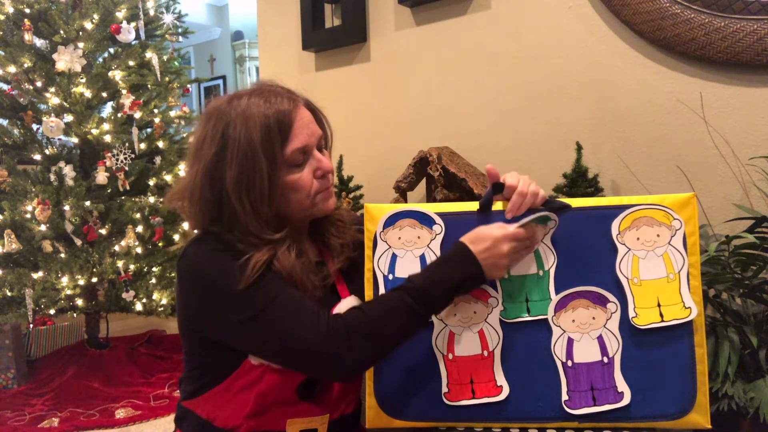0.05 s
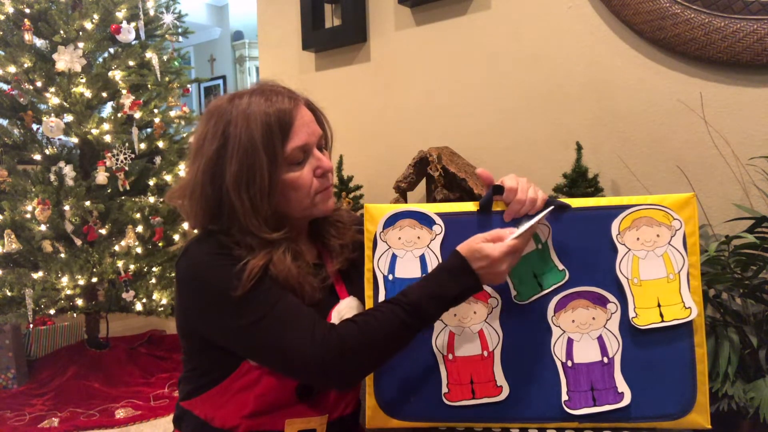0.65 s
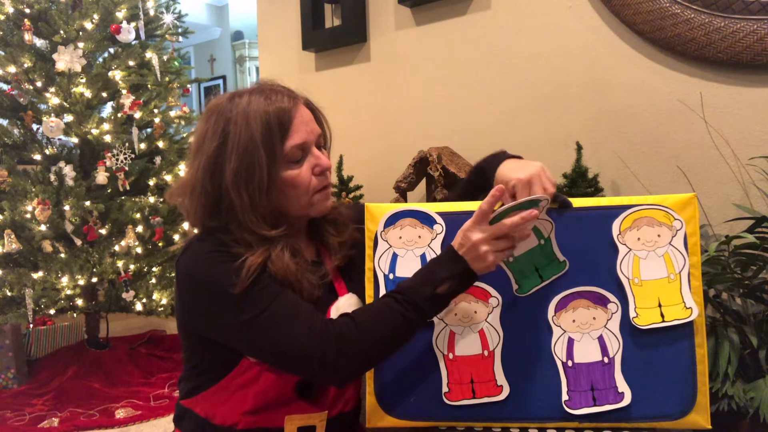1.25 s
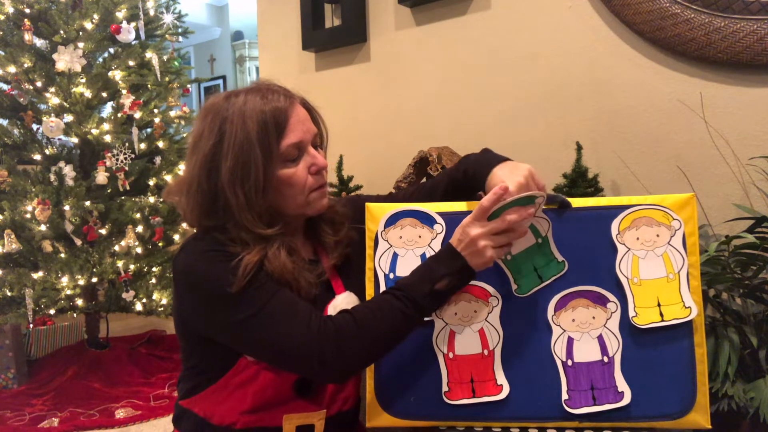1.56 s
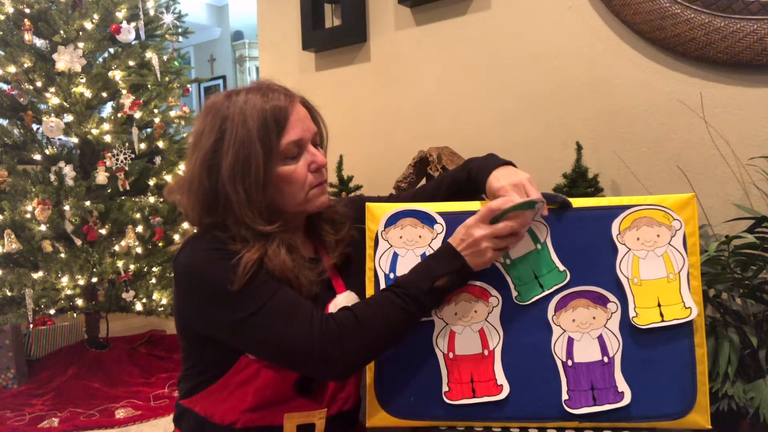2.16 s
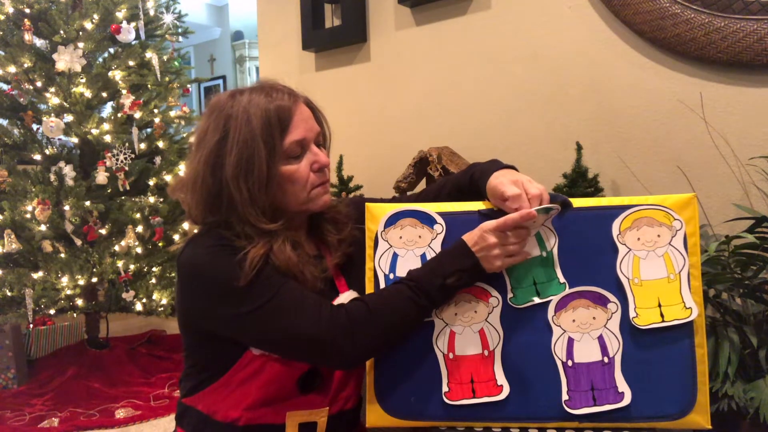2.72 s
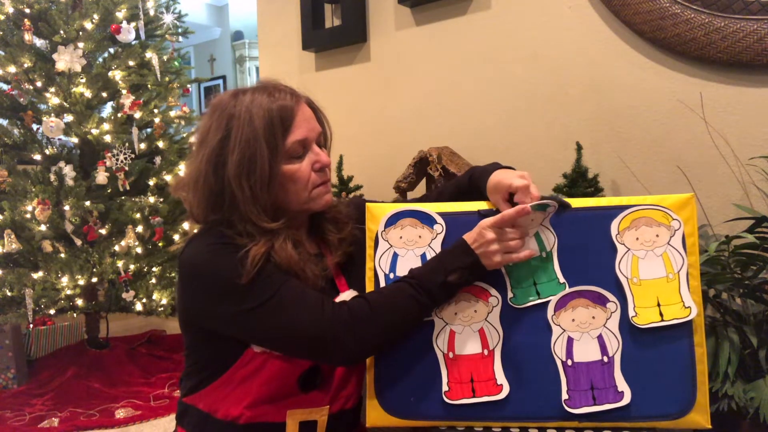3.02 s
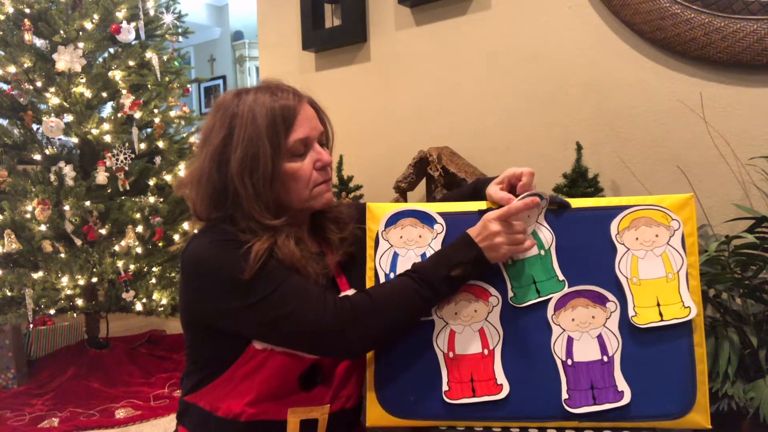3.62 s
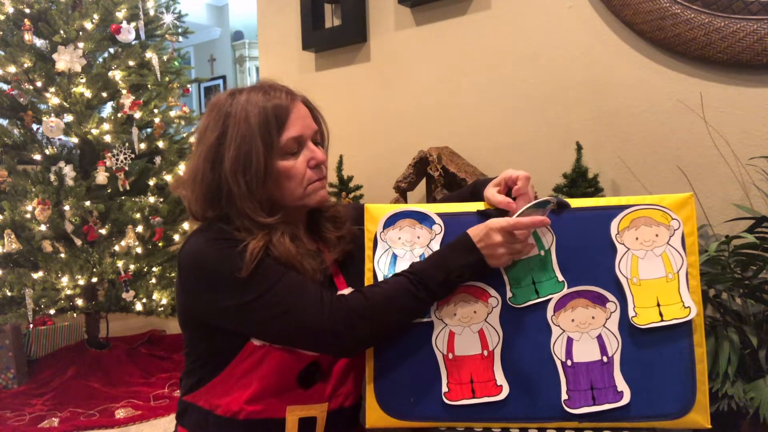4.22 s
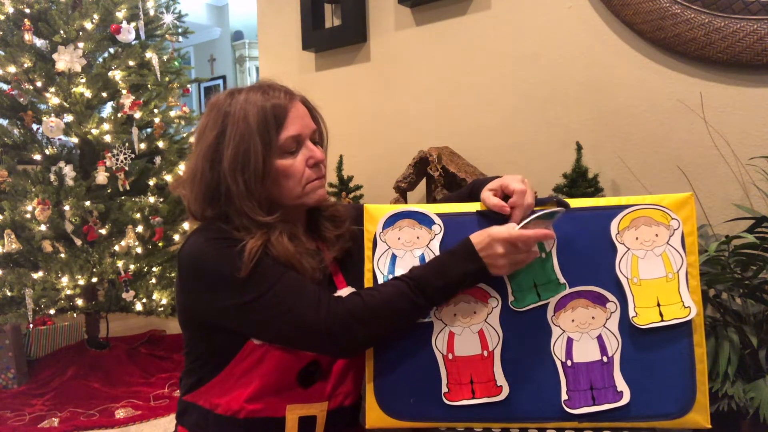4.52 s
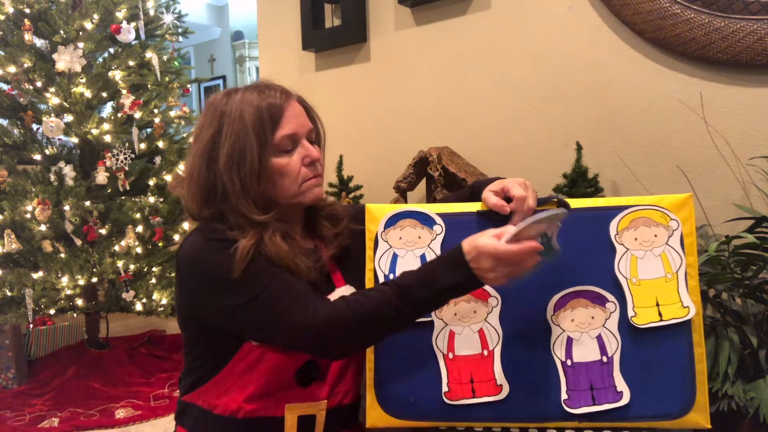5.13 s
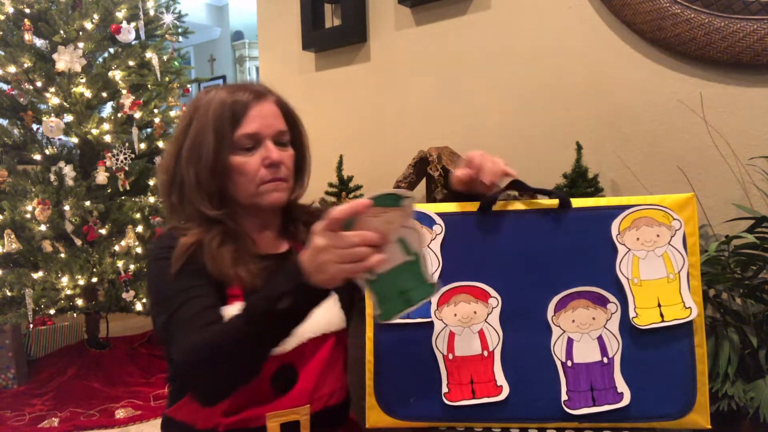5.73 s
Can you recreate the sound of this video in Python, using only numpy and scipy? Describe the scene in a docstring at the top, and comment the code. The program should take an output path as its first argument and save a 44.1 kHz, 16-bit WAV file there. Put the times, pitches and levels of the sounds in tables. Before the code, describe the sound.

In a quiet living room, a nearby microphone catches a card cutout being peeled from a felt board. First comes a short grainy scrape, then soft finger rubbing and occasional papery clicks. Later the hook fastener tears free in several ragged, scratchy bursts, louder than the rest, with soft knocks from the board. Two tiny ticks follow, leaving only low room rumble and faint hiss.

```python
"""Stiff card scrapes over felt with a few dry ticks: a paper cutout is being worked off a felt board.
Fingers rub and pick at it, a sleeve drags on the frame, then its hook fastener lets go in short rips.
Each hook that snaps free gives a tiny crack, sends a bending wave through the card and tugs the board.
The board thumps as it springs back. Around it all: a living room's short tail and low rumble."""
import sys
import numpy as np
from scipy import signal
from scipy.fft import rfft, irfft
from scipy.io import wavfile

SR = 44100
rng = np.random.default_rng(int(sys.argv[2]) if len(sys.argv) > 2 else 0)


def wav_record(signal):
    """Record a signal, one row per channel, as 16-bit PCM in the file named by sys.argv[1]."""
    frames = np.transpose(np.atleast_2d(signal))
    bounded = np.clip(frames, -1, 1)
    # unit amplitude maps onto the largest positive 16-bit level
    quanta = np.round(bounded * 32767).astype(np.int16)
    wavfile.write(sys.argv[1], SR, quanta)


N = 254765
TIME = np.arange(N) / SR
USUAL_PITCH_HZ, BEND_SPREAD = 1673, 0.069  # card at its usual bend; share it strays from hook to hook

# rumble and hiss of the house: frequency_hz, level_db
ROOM_TONE_SPECTRUM = [(15, -72), (28, -39), (45, -6.5), (76, 2.5), (120, -1.5), (190, -6), (300, -5),
                      (480, -7.5), (800, -14), (1400, -17), (2000, -18), (4000, -22.5), (7700, -23.5),
                      (9000, -26.5), (16000, -30.5)]
# colour of the room's tail: frequency_hz, gain_db
TAIL_SPECTRUM = [(100, -19.5), (350, -1), (750, -2), (1100, -6.5), (1420, -10.5), (1700, -11.5),
                 (1950, -13.5), (2400, -6.5), (3000, -6), (3800, -5), (5500, -10), (7500, -5.5),
                 (14000, -6)]
# decay of the room's tail: frequency_hz, t60_s
TAIL_DECAY = [(120, 0.2), (500, 0.22), (1600, 0.27), (4000, 0.25), (14000, 0.12)]

# skin rubbing on card: frequency_hz, level_db
SKIN_SPECTRUM = [(100, -5), (320, -3), (900, -10.5), (1200, -3), (1520, 4), (1850, 0), (2500, -1),
                 (3700, -7.5), (7000, -12), (9000, -17.5), (15500, -24)]
# card scraping on felt: frequency_hz, level_db
SCRAPE_SPECTRUM = [(100, -46), (320, -7), (560, -14.5), (700, -5), (850, -12.5), (1100, -2), (1400, -1.5),
                   (1750, 6), (2100, 1), (2450, 2.5), (3300, -5), (4500, -7), (6600, -8.5), (9000, -17),
                   (15500, -28)]
# what the card radiates when flicked: frequency_hz, level_db
CARD_SPECTRUM = [(500, -27), (790, -12), (960, -18.5), (1150, -8.5), (1350, -1), (1490, 5.5), (1690, -6.5),
                 (1920, 1), (2250, -6), (3000, -14.5), (4200, -20), (8000, -54)]
# the crack of a hook: frequency_hz, level_db
CRACK_SPECTRUM = [(900, -12.5), (2000, 0.5), (3200, -2), (4500, -3.5), (6800, -0.5), (8500, -8),
                  (10800, -9.5), (13000, -14.5), (15500, -24)]
# the board's modes before a hand damps them: pitch_hz, level_db, t60_s
BOARD_MODES = [(73, -47, 0.071), (132.3, -9.5, 0.15), (190, -16, 0.057), (296, -3, 0.05), (326, -1, 0.067),
               (393, 4, 0.026), (485, -17, 0.068), (518, -1.5, 0.036), (698, 1, 0.059), (803, -2, 0.034),
               (1058, 0.5, 0.043)]

# a sleeve drags over the top of the board: start_s, length_s, level_db
SLEEVE_DRAGS = [(1.63, 0.033, -54), (1.745, 0.066, -52.5)]
# fingers stroke the card: start_s, length_s, level_db
FINGER_RUBS = [(1.64, 0.25, -59.5), (1.94, 0.14, -51.5), (2.12, 0.29, -51.5), (2.52, 0.022, -56),
               (2.7, 0.019, -57), (2.83, 0.045, -53.5), (3.035, 0.027, -54.5), (3.29, 0.26, -56.5)]
# the card slides over the felt: start_s, length_s, level_db
CARD_SLIDES = [(0.0, 0.039, -34.5), (0.1, 0.11, -38.5), (0.245, 0.02, -36), (0.62, 0.05, -56.5),
               (0.77, 0.042, -51), (0.9, 0.023, -54), (1.035, 0.076, -54.5), (1.4, 0.063, -61.5)]
# the board springs back as the fastener gives: start_s, level_db
BOARD_RECOILS = [(4.101, -41), (4.336, -38), (4.39, -34), (4.909, -29), (4.922, -37)]
# a whole patch of hooks gives way: start_s, length_s, level_db, unused
HOOK_RIPS = [(3.679, 0.00385, -35.5, -47), (3.744, 0.014, -30.5, -45), (3.804, 0.003, -40.5, -46),
             (4.033, 0.009, -32, -44), (4.059, 0.045, -35.5, -41), (4.328, 0.02, -37.5, -33),
             (4.35, 0.028, -28, -30.5), (4.381, 0.052, -28.5, -34.5), (4.582, 0.03, -30.5, -42),
             (4.758, 0.017, -38, -45), (4.899, 0.025, -28, -36)]
# single snaps and ticks: mostly hooks and fibres letting go, with a few handling ticks and a bump on the board
# (levels before trims): start_s, pitch_hz, card_db, crack_db, tug_db
ACCENT_SNAPS = [(0.002, 1600, -34.5, -37, -38), (0.0381, 1640, -29.5, -54, -37.5),
                (0.246, 2020, -51, -41, -58), (0.2793, 2000, -43, -41, -38), (0.547, 1670, -38.5, -49, -49.5),
                (0.918, 1680, -41, -56, -49), (1.037, 1680, -57, -63, -44.5), (1.2892, 1800, -47, -51, -51),
                (1.533, 1860, -59, -51.5, -51), (1.9093, 1590, -43.5, -53, -55),
                (1.9573, 1655, -34.5, -44, -43.5), (2.014, 2180, -64, -47, -63),
                (2.3083, 1581, -31.5, -41, -39.5), (2.5036, 1620, -42, -50, -47),
                (2.8595, 1670, -35, -40.5, -39), (3.0512, 1714, -36.5, -53, -37.5),
                (3.3554, 1820, -40.5, -58, -61), (3.4272, 1800, -25, -37, -35.5),
                (3.578, 1710, -36, -48, -59), (3.684, 1670, -34, -44, -41),
                (3.701, 1780, -33.5, -38.5, -35.5), (3.734, 1930, -29, -37, -41),
                (3.8045, 1860, -30.5, -36, -37.5), (3.9581, 1705, -37.5, -41.5, -55),
                (3.9933, 1800, -39, -44, -61), (4.0298, 1890, -25.5, -32.5, -35.5),
                (4.0495, 1780, -21.5, -27, -27.5), (4.0985, 1710, -23, -30.5, -28),
                (4.3329, 1970, -24.5, -27.5, -26), (4.354, 1550, -18, -25, -28.5),
                (4.389, 1530, -20, -35, -20), (4.4115, 1515, -27, -34, -24), (4.4421, 1620, -25.5, -32, -53),
                (4.4622, 1780, -29.5, -36, -45), (4.5172, 1700, -43, -49, -49),
                (4.5493, 1606, -28.5, -33.5, -43.5), (4.5637, 1610, -27, -38, -59),
                (4.605, 1750, -21, -28.5, -28.5), (4.722, 1690, -49, -47, -60), (4.7304, 1650, -34, -42, -55),
                (4.7495, 1690, -28, -30.5, -51), (4.777, 1745, -22.5, -30, -40.5),
                (4.8575, 1670, -29.5, -34.5, -46), (4.9055, 1680, -19, -24, -28),
                (4.9224, 1810, -23.5, -37, -26), (5.2947, 1700, -52, -52.5, -70),
                (5.3377, 1690, -53, -56, -68)]


def from_db(db):
    """Decibels to gain."""
    return 10 ** (np.asarray(db) / 20)


def rms_one(x):
    """Scale to rms 1."""
    return x / np.sqrt(np.mean(x ** 2) + 1e-20)


def as_burst(x):
    """Scale a short sound to the energy of 4 ms at rms 1."""
    return x * np.sqrt(.004 * SR / (np.sum(x ** 2) + 1e-20))


def add(out, start_s, sound):
    """Mix a sound in at its cue."""
    at = int(start_s * SR)
    out[at:at + len(sound)] += sound[:len(out) - at]


def colour(x, spectrum):
    """Minimum-phase EQ that follows a spectrum, so nothing rings ahead of an attack."""
    size = 8192
    hz, db = np.transpose(spectrum)
    bin_hz = np.arange(size // 2 + 1) * SR / size
    log_gain = np.log(from_db(np.interp(np.log(bin_hz + 1), np.log(hz), db)))
    cepstrum = irfft(log_gain)[:size // 2]
    cepstrum[1:] *= 2
    impulse = irfft(np.exp(rfft(cepstrum, size)))
    return signal.fftconvolve(x, impulse)[:len(x)]


def drift(per_s):
    """A wandering random control signal at rms 1."""
    knots = rng.standard_normal(4000)
    return rms_one(np.interp(TIME * per_s, np.arange(len(knots)), knots))


def grains(per_s, spread_db):
    """Random clicks of uneven size and sign."""
    sizes = from_db(spread_db * np.minimum(rng.exponential(1, N), 4))
    signs = rng.choice([-1, 1], N)
    return sizes * signs * (rng.random(N) < per_s / SR)


def strokes(rows, attack_s, release_db_per_s):
    """Envelope of a series of strokes: each swells up to its start, holds for its length and dies away."""
    gain = np.zeros(N)
    for start_s, length_s, level_db in rows:
        swell = np.clip(1 + (TIME - start_s) / attack_s, 0, 1)
        fade_db = release_db_per_s * np.maximum(TIME - start_s - length_s, 0)
        gain = np.maximum(gain, swell * from_db(level_db - fade_db))
    return gain


def room_tone(level_db=-53.5):
    """The bed: low steady rumble of the house under a faint hiss."""
    rumble = colour(rng.standard_normal(N + SR), ROOM_TONE_SPECTRUM)[SR:]
    return from_db(level_db) * rms_one(rumble)


def living_room(x, onset_s=0.002):
    """The room adds a short diffuse tail that builds quickly and dies soonest in the high treble."""
    t = TIME[:SR // 2]
    hz, t60 = np.transpose(TAIL_DECAY)
    edges_hz = np.geomspace(50, 17000, 8)
    build_up = 1 - np.exp(-(t / onset_s) ** 2)
    tail = np.zeros(len(t))
    for low, high in zip(edges_hz, edges_hz[1:]):
        band_t60 = np.interp(np.log(low * high) / 2, np.log(hz), t60)
        envelope = from_db(-60 * t / band_t60) * build_up
        band = signal.butter(2, [low, high], "band", fs=SR, output="sos")
        noise = signal.sosfilt(band, rng.standard_normal(len(t)))
        tail += noise * envelope / np.linalg.norm(envelope)
    return x + signal.fftconvolve(x, colour(tail, TAIL_SPECTRUM))[:N]


def sleeve(band_hz=(290, 530), rough_db=6.5):
    """Cloth dragged over the frame makes the board groan, faint and rough."""
    band = signal.butter(2, band_hz, "band", fs=SR, output="sos")
    groan = signal.sosfilt(band, grains(per_s=900, spread_db=0.5) + 1e-18)
    roughness = from_db(rough_db * drift(per_s=120))
    return strokes(SLEEVE_DRAGS, attack_s=.03, release_db_per_s=250) * rms_one(groan * roughness)


def friction(pressure, spectrum, flutter_db=2.5):
    """A grainy scrape: fibres catch and slip by the thousand, in uneven spurts."""
    fibres = colour(grains(per_s=6000, spread_db=2.5), spectrum)
    flutter = from_db(flutter_db * drift(per_s=160))
    return pressure * flutter * rms_one(fibres)


def board_knock(detune, uneven_db, rise_s, hand_t60_s):
    """One blow rings the board's modes, a little differently each time; the holding hand damps them."""
    hz, db, t60 = np.transpose(BOARD_MODES)[:, :, None]
    t = TIME[:SR // 8]
    shift, strength, phase = rng.standard_normal((3, len(BOARD_MODES), 1))
    decays = from_db(db + uneven_db * strength - 60 * t / t60)
    tones = np.sin(2 * np.pi * hz * (1 + detune * shift) * t + np.pi * phase)
    attack = 1 - np.exp(-t / rise_s)
    damping = from_db(-60 * t / hand_t60_s)
    return as_burst((decays * tones).sum(0) * attack * damping)


def recoils(dull_hz=220):
    """Let go, the stretched board springs back with a dull thump on its low modes."""
    out = np.zeros(N)
    for start_s, level_db in BOARD_RECOILS:
        knock = board_knock(detune=0.042, uneven_db=0, rise_s=.0028, hand_t60_s=0.14)
        thump = signal.lfilter(*signal.butter(1, dull_hz, fs=SR), knock)
        add(out, start_s, from_db(level_db) * as_burst(thump))
    return out


def card_flick(travel_s=0.000401, echo_s=0.0011096, edge_gain=0.85):
    """A bending wave in card: highs run fastest, so it chirps down; two edges send it back."""
    size = 2048
    hz = np.arange(size // 2 + 1) * SR / size
    bounces = np.arange(3)
    delays_s = travel_s + echo_s * bounces * rng.uniform(.8, 1.2, 3)  # as they are at 1500 Hz
    arrivals = np.exp(-4j * np.pi * delays_s[:, None] * np.sqrt(1500 * hz))
    wave = irfft((-edge_gain) ** bounces @ arrivals)
    return as_burst(colour(wave, CARD_SPECTRUM))


def snap(pitch_hz, card_db, crack_db, tug_db, crack_s=0.0017, board_lag_s=0.00046, tug_trim_db=-1.5):
    """One hook lets go: a bright crack, a chirp in the card (higher when bent tight), a board knock."""
    out, t = np.zeros(SR // 7), TIME[:SR // 50]
    crack = colour(rng.standard_normal(len(t)) * np.exp(-t / crack_s), CRACK_SPECTRUM)
    chirp = card_flick()
    repitched = np.interp(t * pitch_hz / USUAL_PITCH_HZ, TIME[:len(chirp)], chirp)
    knock = board_knock(detune=0.021, uneven_db=2, rise_s=0.0019, hand_t60_s=0.34)
    add(out, 0, from_db(crack_db) * as_burst(crack))
    add(out, 0, from_db(card_db) * as_burst(repitched))
    add(out, board_lag_s, from_db(tug_db + tug_trim_db) * knock)
    return out


def snap_runs(rows, per_s, spread_db, card_db, crack_db, tug_db):
    """Hooks or fibres load and let go in a ragged run through each pull, at levels relative to it."""
    out = np.zeros(N)
    balance_db = np.array([card_db, crack_db, tug_db])
    for start_s, length_s, pull_db, *_ in rows:
        count = max(1, round(length_s * per_s))
        for slot, (late, bend, *uneven) in enumerate(rng.standard_normal((count, 5))):
            cue_s = start_s + length_s * (slot + np.clip(.3 + .2 * late, 0, 1)) / count
            pitch_hz = USUAL_PITCH_HZ * np.exp(BEND_SPREAD * bend)
            levels_db = pull_db + balance_db + spread_db * np.clip(uneven, -1.5, 1.5)
            add(out, cue_s, snap(pitch_hz, *levels_db))
    return out


def single_snaps(trim_db=-0.26):
    """The accents: snaps and ticks that stand out on their own, mostly hooks and fibres letting go, a few from
    handling and a bump on the board."""
    out = np.zeros(N)
    for start_s, pitch_hz, *levels_db in ACCENT_SNAPS:
        add(out, start_s, snap(pitch_hz, *levels_db))
    return from_db(trim_db) * out


def scene():
    """The mono mix: rubbing and the ripping fastener share one room, over its bed of rumble."""
    scrape = friction(strokes(CARD_SLIDES, attack_s=0.088, release_db_per_s=176), SCRAPE_SPECTRUM)
    fingers = friction(strokes(FINGER_RUBS, attack_s=0.12, release_db_per_s=145.5), SKIN_SPECTRUM)
    rips = snap_runs(HOOK_RIPS, per_s=170, spread_db=2, card_db=2.5, crack_db=-4.5, tug_db=-11)
    # fibres catch under the fingers, and the card's edge snags on the felt
    catches = snap_runs(FINGER_RUBS, per_s=11, spread_db=0.5, card_db=1.5, crack_db=-6, tug_db=-1)
    snags = snap_runs(CARD_SLIDES, per_s=30, spread_db=0.5, card_db=-8, crack_db=-10, tug_db=-11)
    rubbing = scrape + snags + fingers + catches + sleeve()
    fastener = single_snaps() + rips + recoils()
    return (living_room(rubbing + fastener) + room_tone())[None]


def record(dry, low_cut_hz=36, high_cut_hz=16100):
    """The microphone sheds the deepest bass; the top is cut steeply."""
    low_cut = signal.butter(4, low_cut_hz, "high", fs=SR, output="sos")
    high_cut = signal.ellip(10, .1, 80, high_cut_hz, fs=SR, output="sos")
    return signal.sosfilt(high_cut, signal.sosfilt(low_cut, dry))


dry = scene()
out = record(dry)
wav_record(out)
```